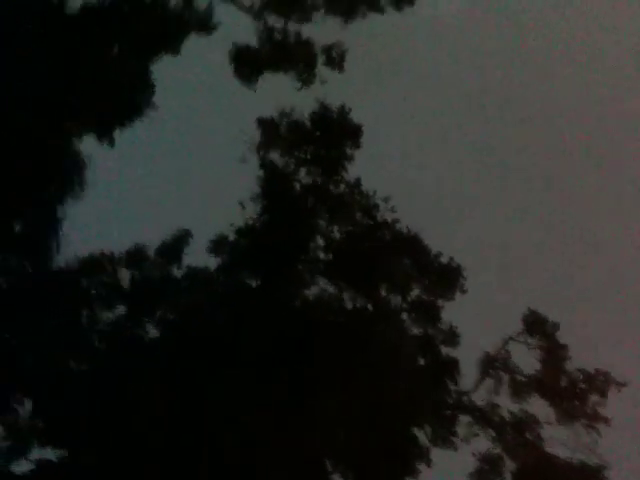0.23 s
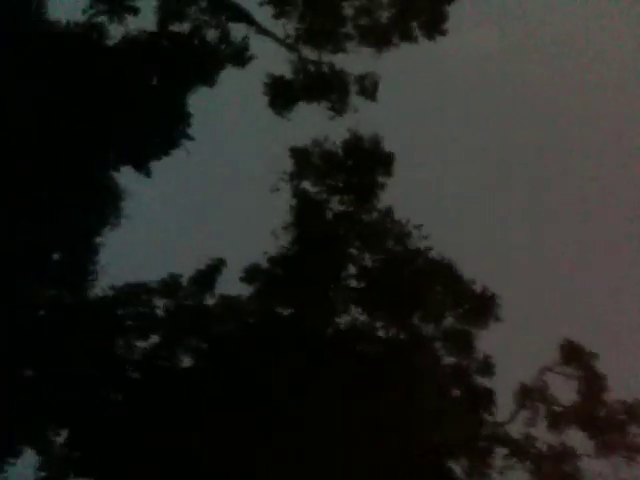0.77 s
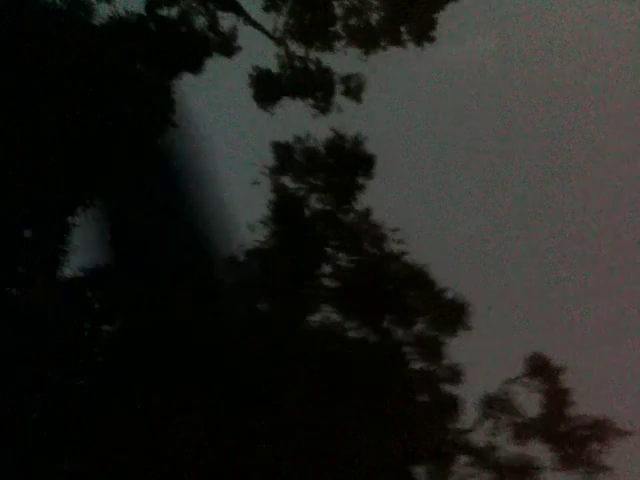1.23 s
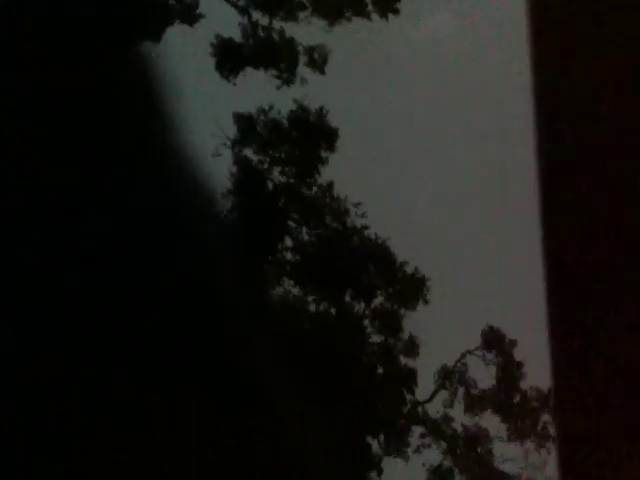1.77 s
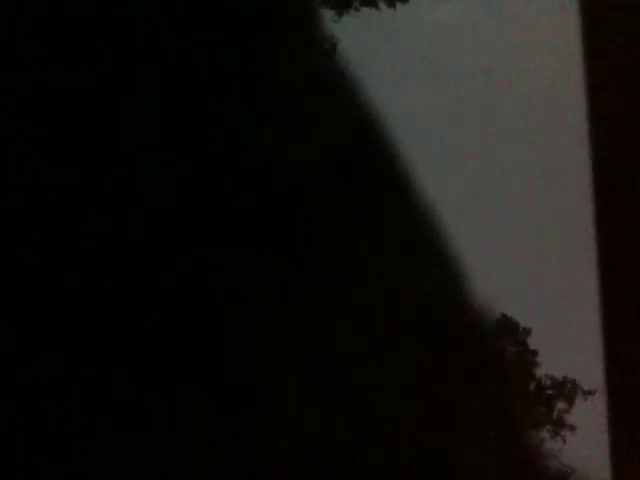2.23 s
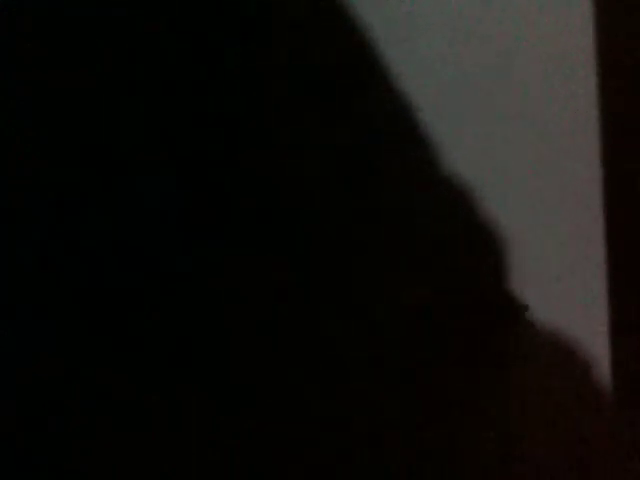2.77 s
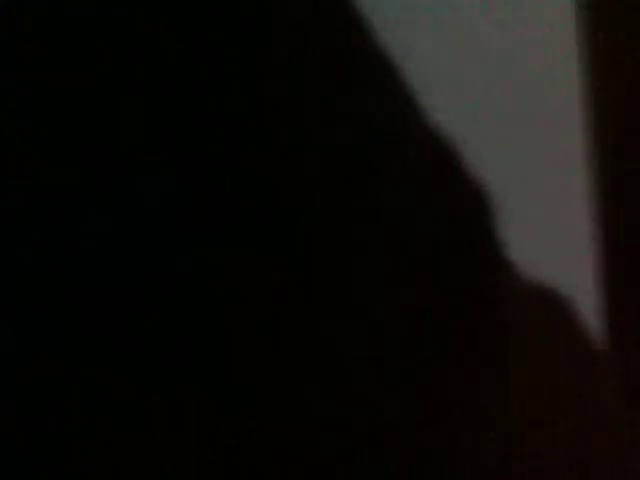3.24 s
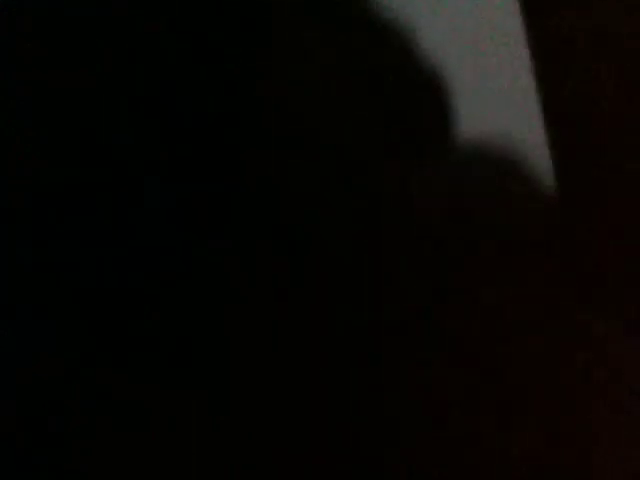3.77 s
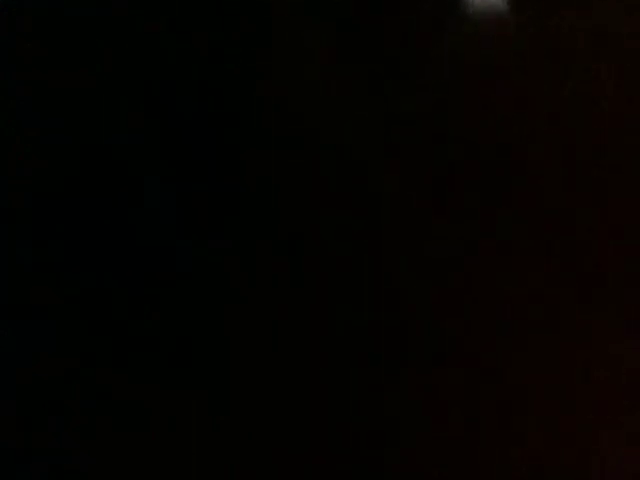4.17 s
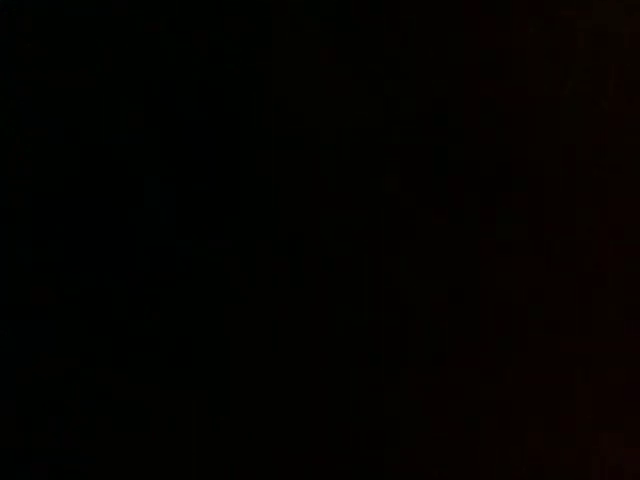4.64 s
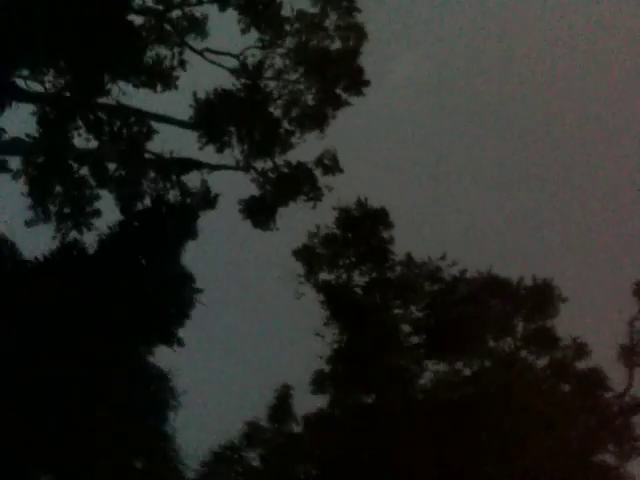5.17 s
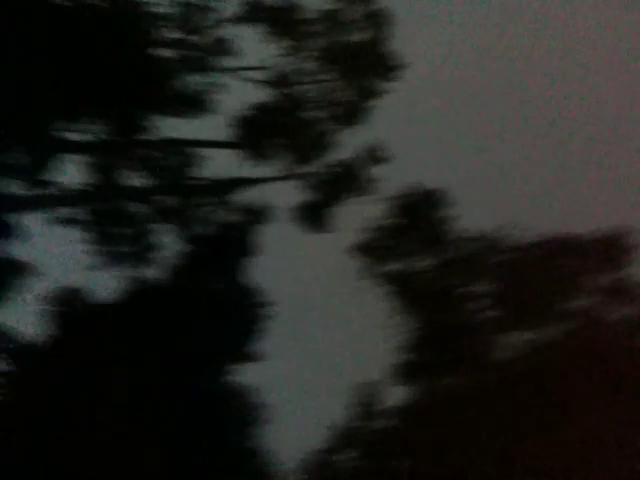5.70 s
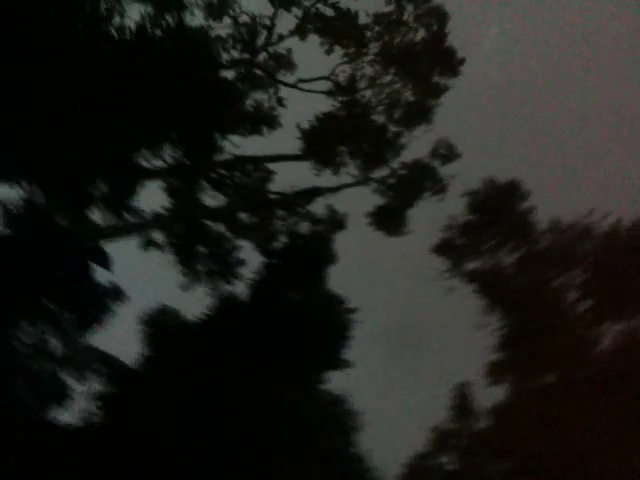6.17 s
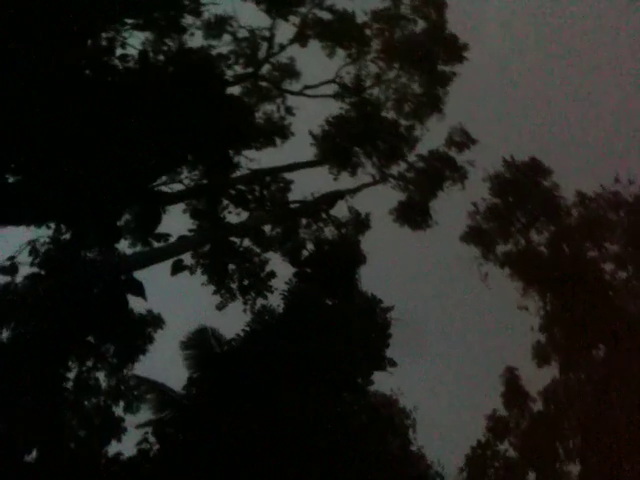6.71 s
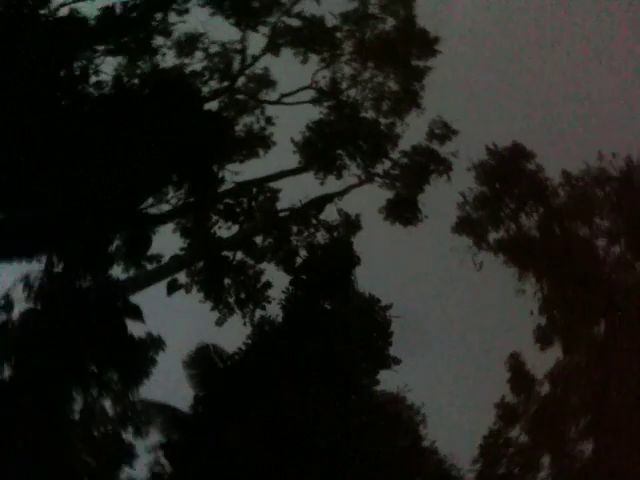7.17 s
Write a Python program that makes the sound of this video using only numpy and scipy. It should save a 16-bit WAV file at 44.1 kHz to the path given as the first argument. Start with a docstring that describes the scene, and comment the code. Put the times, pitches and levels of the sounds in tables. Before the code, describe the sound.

Many small frogs call nonstop, a low "co" and an upswept "qui", echoing among trees; a hand clicks and brushes the camera.

```python
"""Coqui frogs at dusk: near and far sine-like calls, a level low "co" and a rising "qui".
Far "qui" come in waves about four a second; far "co" join the near ones; noise echoes stand for trees.
Other frogs whistle, climb, peep and chip; crickets chirp unevenly as pulsed tones over bands of noise.
Soft air noise lies below; midway the hand-held camera clicks and brushes cloth (shaped noise, decaying sines)."""
import sys
import numpy as np
from scipy import signal
from scipy.fft import rfft, irfft, next_fast_len
from scipy.io import wavfile
from scipy.ndimage import uniform_filter1d

SR = 44100
rng = np.random.default_rng(int(sys.argv[2]) if len(sys.argv) > 2 else 0)


def store_pcm(level_fs):
    """Save levels as 16-bit WAV."""
    pcm = np.round(np.clip(level_fs, -1, 1) * 32767).astype(np.int16)
    wavfile.write(sys.argv[1], SR, np.atleast_2d(pcm).T)


N = 327663
TIME = np.arange(N) / SR
# All table levels are relative: gains, echoes and filters follow.


def undb(db):
    """Decibels to gain."""
    return 10 ** (np.asarray(db) / 20)


def unit(x):
    """Scale to rms 1."""
    return x / np.sqrt(np.mean(x ** 2))


def add(out, start_s, sound):
    """Mix a sound in at a time, trimmed to the scene."""
    i = int(start_s * SR)
    lo, hi = max(i, 0), min(i + len(sound), N)
    if hi > lo:
        out[lo:hi] += sound[lo - i:hi - i]


def colour(x, points):
    """Filter by a (freq_hz, level_db) outline, straight over log frequency; rms 1."""
    freq_hz, level_db = np.transpose(points)
    size = next_fast_len(N)
    bins_hz = np.maximum(np.fft.rfftfreq(size, 1 / SR), 1)
    gain = undb(np.interp(np.log(bins_hz), np.log(freq_hz), level_db))
    return unit(irfft(rfft(x, size) * gain, size)[:N])


def band(hz, width_hz):
    """Noise in one resonance; rms 1."""
    size = next_fast_len(N)
    bins_hz = np.fft.rfftfreq(size, 1 / SR)
    resonance = 1 / (1 + ((bins_hz - hz) / width_hz) ** 2)
    return unit(irfft(rfft(rng.standard_normal(size)) * resonance)[:N])


def walk(rate_hz):
    """Random drift around 0 in straight ramps, rms about 0.55."""
    k = int(SR / rate_hz)
    steps = np.repeat(rng.standard_normal(N // k + 1), k)
    return 0.68 * uniform_filter1d(steps, k)[:N]


def trees(x, t60_s):
    """Echoes from trunks and leaves, drawn anew for each call; they carry as much energy as the call."""
    t = TIME[:SR // 2]
    spikes = rng.standard_normal(len(t)) ** 3
    echoes = spikes * undb(-60 * t / t60_s) * (1 - np.exp(-t / 0.0044))
    heard = signal.fftconvolve(x, echoes)
    return heard * np.linalg.norm(x) / np.linalg.norm(heard)


def flutter(x, depth, fade_db=0):
    """Paths through foliage make a voice grainy, and let it swell and fade within a note."""
    return x * (1 + depth * walk(260)) * undb(fade_db * walk(55))


def note(length_s, start_hz, end_hz, second_db=-52, third_db=-52, attack_s=0.0016, arch=0.0022,
         swell=0.28, release_s=0.0037, late_swell=1.17, glide_power=1.9):
    """A vocal sac sings a near sine: it swells past the middle; its glide flattens and arches over."""
    u = np.linspace(0, 1, int(length_s * SR))
    glide_hz = end_hz + (start_hz - end_hz) * (1 - u) ** glide_power
    hz = glide_hz * (1 + arch * (np.sin(np.pi * u) - 1))
    phase = 2 * np.pi * np.cumsum(hz) / SR
    edges = np.tanh(u * length_s / attack_s) * np.tanh((1 - u) * length_s / release_s)
    effort = edges * 0.84 * (1 - swell + swell * np.sin(np.pi * u ** late_swell))
    voice = np.sin(phase) + undb(second_db) * np.sin(2 * phase) + undb(third_db) * np.sin(3 * phase)
    return np.sqrt(2) * effort * voice


# spectrum of distant air and leaves: freq_hz, level_db
AIR_SPECTRUM = [(25, -18), (45, -33), (75, -16), (125, -2), (180, 2), (400, 0.5), (800, -1), (1200, -4),
                (3800, -11.5), (5200, -11), (7400, -19), (8800, -17.5), (12000, -18), (15500, -19.5)]


def air():
    """Distant air and leaves: coloured noise with a slight drift in level."""
    return colour(rng.standard_normal(N), AIR_SPECTRUM) * undb(-68.5 + .2 * walk(7.1))


def high_tone(hz=15000, beat_hz=30, db=-94):
    """A faint, wavering tone near the top of hearing: two close sines that beat."""
    beating = np.sin(2 * np.pi * hz * TIME) * np.cos(np.pi * beat_hz * TIME)
    return 2 * undb(db + 2.7 * walk(11.0)) * beating


def insect(hz, width_hz, db, waver_db):
    """Many far wings stridulate near one pitch and blur into a wavering band of noise."""
    return band(hz, width_hz) * undb(db + waver_db * walk(9.8))


def zip_call(start_s=5.97, hz=7000, width_hz=550, db=-67, attack_s=0.0021, decay_s=0.035):
    """One insect gives a single short, high rasp."""
    t = np.maximum(TIME - start_s, 0)
    return band(hz, width_hz) * undb(db) * (1 - np.exp(-t / attack_s)) * np.exp(-t / decay_s)


# cricket chirps: start_s, pitch_hz, level_db
CRICKET_CHIRPS = [(0.021, 5940, -73), (0.441, 5930, -72.5), (.87, 5905, -76), (1.25, 5910, -74.5),
                  (1.619, 5910, -75.5), (2.091, 5960, -75.5), (2.46, 5930, -75), (2.831, 5870, -77.5),
                  (3.22, 5940, -77), (3.6, 5870, -76), (3.79, 5830, -75.5), (4.049, 5860, -79),
                  (4.21, 5770, -78), (4.47, 6000, -80), (4.84, 6000, -81), (5.359, 5820, -80),
                  (5.691, 5860, -75.5), (5.869, 5820, -75), (6.22, 5950, -75.5), (6.47, 5840, -88),
                  (6.769, 5800, -74), (7.18, 5850, -80), (7.3, 5910, -78.5)]


def crickets(length_s=0.12, stroke_hz=30, sag_hz=90, gain_db=1.5, t60_s=.14):
    """A chirp is a short run of wing strokes, each sagging in pitch as the wing slows, blurred by trees."""
    out, t = np.zeros(N), TIME[:int(length_s * SR)]
    stroke = t * stroke_hz % 1
    effort = np.sin(np.pi * stroke) ** 2 * np.sqrt(np.sin(np.pi * t / length_s))
    for start_s, pitch_hz, level_db in CRICKET_CHIRPS:
        phase = 2 * np.pi * np.cumsum(pitch_hz + sag_hz * (.5 - stroke)) / SR
        chirp = unit(np.sin(phase) * effort) * undb(level_db + gain_db)
        add(out, start_s, chirp * undb(-5.5))
        add(out, start_s, trees(chirp, t60_s) * undb(-2))
    return out


# faint hollow taps: start_s, level_db
HOLLOW_TAPS = [(0.383, -64), (1.143, -60), (3.01, -67)]


def taps(hz=560, width_hz=160, decay_s=0.0066):
    """Small dull taps nearby: short bursts of one noise resonance."""
    out, t = np.zeros(N), TIME[:SR // 16]
    dull = band(hz, width_hz)
    envelope = np.exp(-t / decay_s) * (1 - np.exp(-t / 0.0018))
    for start_s, level_db in HOLLOW_TAPS:
        add(out, start_s, 2 * undb(level_db) * dull[int(start_s * SR):][:len(t)] * envelope)
    return out


# cloth brushing the case: peak_s, rise_s, fall_s, level_db, body_db (case resonance against hiss)
CLOTH_BRUSHES = [(2.454, 0.0087, 0.016, -67.5, -14), (2.5, 0.037, 0.027, -71.5, 6),
                 (2.791, 0.0056, 0.015, -68, 1), (3.757, 0.009, 0.019, -65.5, -18),
                 (4.48, 0.059, 0.15, -64.5, -9), (4.536, .004, 0.0047, -80, 16),
                 (4.578, 0.016, 0.021, -68.5, 8), (4.625, 0.034, 0.03, -69, -14),
                 (4.66, 0.023, 0.015, -62, -4), (4.71, .03, 0.034, -79, -9),
                 (4.785, 0.031, 0.028, -58.5, -14), (4.806, 0.017, 0.015, -58.5, 11.5),
                 (4.928, 0.0014, 0.0059, -76, 27.5)]
# spectrum of the cloth hiss: freq_hz, level_db
CLOTH_SPECTRUM = [(60, -44), (300, -13), (700, 4), (1200, -11), (3500, -6.5), (6500, 6.5), (9000, -3),
                  (15000, -5)]
# spectrum of the brushed case: freq_hz, level_db
CASE_SPECTRUM = [(60, -35), (560, -37), (700, -2.5), (850, -7), (1050, -16), (2200, 4.5), (3600, -1),
                 (5000, -16.5), (12000, -66)]


def brushes(grain_db=2.5, catch_db=3, rattle_db=4.5):
    """Cloth catches and slips on the case in tiny grains: hiss plus the rattling case."""
    grains = rng.standard_normal(N) * undb(grain_db * walk(1100) + catch_db * walk(170))
    hiss = colour(grains, CLOTH_SPECTRUM)
    body = colour(grains * undb(rattle_db * walk(400)), CASE_SPECTRUM)
    out = np.zeros(N)
    for peak_s, rise_s, fall_s, level_db, body_db in CLOTH_BRUSHES:
        pressure = np.exp(-((TIME - peak_s) / np.where(TIME < peak_s, rise_s, fall_s)) ** 2)
        out += pressure * undb(level_db) * (hiss + undb(body_db) * body)
    return out


# fingers on the case: start_s, thud_hz, thud_db, ring_db, click_db
FINGER_KNOCKS = [(2.79, 104, -65, -82, -75), (3.158, 181, -60, -52.5, -26), (3.826, 203, -57, -63, -48),
                 (4.493, 193, -58.5, -53, -68), (4.566, 153, -52, -68, -66), (4.577, 170, -59, -55, -40),
                 (4.619, 181, -60, -66, -55), (4.654, 199, -66, -56, -58), (4.795, 197, -85, -58, -37),
                 (4.8, 201, -86, -62, -44), (4.812, 200, -84, -56, -45), (4.926, 220, -65, -61, -63)]
# spectrum of the hard plastic click: freq_hz, level_db
CLICK_SPECTRUM = [(300, -38), (2000, -7.5), (5300, -5), (6100, 3), (7180, -11), (8000, 2), (9000, -7.5),
                  (12500, -11), (15000, -3)]
# hollow ring of the case: freq_hz, decay_s, level_db
RING_MODES = [(470, 0.0026, -7), (650, 0.0041, -2), (765, 0.0044, -2), (1050, .002, -15)]


def knocks(thud_s=0.0037, click_decay_s=0.00099):
    """Fingers knock on the case: a low thud, a plastic click and a hollow ring."""
    out, t = np.zeros(N), TIME[:SR // 8]
    plastic = colour(rng.standard_normal(N), CLICK_SPECTRUM)
    hollow = sum(undb(level_db) * np.sin(2 * np.pi * freq_hz * t) * np.exp(-t / decay_s)
                 for freq_hz, decay_s, level_db in RING_MODES)
    thud_envelope = (t / thud_s * np.exp(1 - t / thud_s)) ** 2
    onset = 1 - np.exp(-t / 0.0009)
    for start_s, thud_hz, thud_db, ring_db, click_db in FINGER_KNOCKS:
        i = int(start_s * SR)
        thud = undb(thud_db) * np.sin(2 * np.pi * thud_hz * t) * thud_envelope
        click = undb(click_db) * plastic[i:i + len(t)] * np.exp(-t / click_decay_s)
        ring = undb(ring_db) * hollow
        add(out, start_s, thud + (ring + click) * onset)
    return out


def low_cut(x, hz=85):
    """The small microphone loses the deep bass of a knock."""
    return signal.sosfilt(signal.butter(3, hz, "high", fs=SR, output="sos"), x)


def far_call(length_s, start_hz, end_hz, t60_s):
    """One distant note: the straight path keeps its glide, slightly stronger echoes come through the trees."""
    call = note(length_s, start_hz, end_hz)
    heard = trees(call, t60_s)
    add(heard, 0, call * undb(-1.5))
    return heard


def stray_frogs(length_s, start_hz, end_hz, pitch_spread, t60_s, count):
    """The farthest frogs call at jittered even steps, on scattered pitches, and merge into a wash; rms 1."""
    out = np.zeros(N)
    jitter = rng.uniform(-1, 1, (count, 2))
    for when_s, (late, pitch) in zip(np.linspace(-.3, N / SR, count), jitter):
        stretch = 1 + pitch_spread * pitch
        call = far_call(length_s, start_hz * stretch, end_hz * stretch, t60_s)
        add(out, when_s + .04 * late, call)
    return unit(out)


def spread(share, count):
    """Pitch ratios of a group of frogs: each has a place of its own within the range."""
    return 1 + share * (np.linspace(-1, 1, count) + rng.uniform(-1.005, 1, count) / count)


def wave_of_calls(pitches_hz, length_s, rise, stagger_s, t60_s):
    """Far frogs join in one by one, each on its own pitch; the energy of one note of rms 1."""
    wave, count = np.zeros(SR), len(pitches_hz)
    turns = (rng.permutation(count) + rng.random(count)) / count
    for turn, hz in zip(turns, pitches_hz):
        call = far_call(length_s, hz * (1 - rise), hz, t60_s)
        add(wave, stagger_s * turn, call)
    return wave * np.sqrt(length_s * SR / np.sum(wave ** 2))


# spectrum of the far "co": freq_hz, level_db
FAR_CO_SPECTRUM = [(1250, -35), (1350, -2.5), (1420, 0.5), (1550, -2), (1620, 1), (1750, 11.5), (1900, 11)]


def far_co(centre_hz=1505, pitch_spread=0.03013, pull=0.669, lag_s=.004, gain_db=-6.5, stray_db=-64):
    """Far frogs join each near "co", around a pitch between that frog's and the usual one."""
    out = undb(stray_db) * stray_frogs(0.051, 1466.6, 1520, pitch_spread=0.079, t60_s=1.0, count=150)
    for start_s, length_s, pitch_hz, level_db in CO_NOTES:
        pitches_hz = (centre_hz + pull * (pitch_hz - centre_hz)) * spread(pitch_spread, count=3)
        wave = wave_of_calls(pitches_hz, length_s, rise=0.01975, stagger_s=.035, t60_s=.4)
        add(out, start_s + lag_s, undb(level_db + gain_db) * wave)
    return colour(out, FAR_CO_SPECTRUM) * np.std(out)


# waves of the far crowd: start_s, level_db
QUI_WAVES = [(.08, -45), (.24, -52.5), (0.518, -44.5), (.89, -51), (.98, -51.5), (1.27, -48.5), (1.5, -54),
             (1.68, -50.5), (1.95, -44), (2.169, -53), (2.33, -43.5), (2.469, -54), (2.719, -49.5),
             (2.871, -50.5), (3.149, -48.5), (3.42, -52), (3.599, -49), (3.859, -52), (4.031, -46),
             (4.29, -47), (4.56, -58.5), (4.691, -43.5), (5.03, -46), (5.299, -51), (5.441, -53),
             (5.74, -44), (5.831, -50), (6.14, -42), (6.301, -51.5), (6.49, -50), (6.6, -49.5),
             (6.91, -47.5), (7.272, -45)]
# spectrum of the far "qui": freq_hz, level_db
FAR_QUI_SPECTRUM = [(1700, 5), (2000, 0.5), (2200, -9.5), (2450, -2.5), (2750, 3), (3020, -3.5), (3120, 4),
                    (3240, 3), (3500, -19)]


def far_qui(top_hz=2840, pitch_spread=.075, lag_s=0.001991, gain_db=-2.5, stray_db=-59):
    """The crowd's rising notes come in waves, over a thin wash of stray callers."""
    out = undb(stray_db) * stray_frogs(.1, 2400, 2880, pitch_spread=.085, t60_s=0.91, count=130)
    for start_s, level_db in QUI_WAVES:
        pitches_hz = top_hz * spread(pitch_spread, count=6)
        wave = wave_of_calls(pitches_hz, length_s=.125, rise=.19, stagger_s=.045, t60_s=.6)
        add(out, start_s + lag_s, undb(level_db + gain_db) * wave)
    return colour(flutter(out, FROG_GRAIN), FAR_QUI_SPECTRUM) * np.std(out)


# sharp falling chips: start_s, start_hz, end_hz, level_db
FALLING_CHIPS = [(2.295, 2530, 1974, -53), (6.623, 2510, 1930, -52)]


def chips(drop_s=0.0073, decay_s=0.017, second_db=-3, echo_db=-8, snap_db=-4, snap_s=0.012):
    """A chip starts with a noisy snap, drops fast in pitch and fades on its low note."""
    out, t = np.zeros(N), TIME[:SR // 12]
    rasp = band(2800, 935)
    for start_s, start_hz, end_hz, level_db in FALLING_CHIPS:
        hz = end_hz + (start_hz - end_hz) * np.exp(-t / drop_s)
        phase = 2 * np.pi * np.cumsum(hz) / SR
        tone = (np.sin(phase) + undb(second_db) * np.sin(2 * phase)) * np.exp(-t / decay_s)
        snap = undb(snap_db) * rasp[int(start_s * SR):][:len(t)] * np.exp(-t / snap_s)
        call = (tone + snap) * (1 - np.exp(-t / 0.0093)) * 2 * undb(level_db)
        add(out, start_s, call)
        add(out, start_s, trees(call, 0.13) * undb(echo_db))
    return out


FROG_GRAIN = .12  # flutter depth
QUI_FADE_DB, LOW_FADE_DB = 2.8, .8  # scale of the fading within a note


def near_frogs(rows, gain_db, echo_db, t60_s, grain, attack_s, arch, swell, fade_db, glide_power=1.9):
    """Single callers; the louder a frog, the closer it is and the smaller its share of echo."""
    direct, echo = np.zeros(N), np.zeros(N)
    for start_s, length_s, start_hz, end_hz, level_db, *harmonics_db in rows:
        call = note(length_s, start_hz, end_hz, *harmonics_db, attack_s=attack_s, arch=arch,
                    swell=swell, glide_power=glide_power)
        call *= undb(level_db + gain_db)
        nearness_db = max(level_db + 47.0, 0)
        add(direct, start_s, call)
        add(echo, start_s, trees(call, t60_s) * undb(echo_db - 0.67 * nearness_db))
    return flutter(direct, grain, fade_db) + echo


# arched peeps: start_s, length_s, start_hz, end_hz, level_db, second_db, third_db
ARCHED_PEEPS = [(2.0, .085, 1630, 1656, -60.5, 1, -13), (2.06, 0.099, 1690, 1650, -65, -3, -12),
                (6.348, 0.1, 1665, 1635, -63.5, 8.5, -12)]


def peeps():
    """Arched, swelling peeps with a strong 2nd harmonic."""
    return near_frogs(ARCHED_PEEPS, gain_db=1.5, echo_db=-9, t60_s=0.23, grain=FROG_GRAIN,
                      attack_s=0.006, arch=0.014, swell=0.8, fade_db=LOW_FADE_DB)


# hoarse climbing calls: start_s, length_s, start_hz, end_hz, level_db, second_db
CLIMBING_CALLS = [(.425, 0.079, 1670, 2035, -57, -14), (.68, .09, 1710, 2063, -58.5, -15)]


def climbs():
    """Climbing calls, made hoarse by deep grain."""
    return near_frogs(CLIMBING_CALLS, gain_db=-2.5, echo_db=-1.5, t60_s=0.2, grain=.7, attack_s=0.0029,
                      arch=0.002, swell=0.14, fade_db=QUI_FADE_DB, glide_power=1.35)


# reedier whistles: start_s, length_s, start_hz, end_hz, level_db, second_db, third_db
REEDY_WHISTLES = [(.265, 0.11, 1406, 1398, -55.5, -28, -19), (1.04, 0.082, 1485, 1470, -52.5, -31, -24),
                  (2.7, 0.089, 1250, 1315, -73, -17, -22), (3.73, 0.12, 1370, 1394, -56.5, -37, -20),
                  (4.22, 0.16, 1570, 1740, -57, -19, -41), (5.88, 0.187, 1364, 1405, -58, -14, -24),
                  (6.864, 0.017, 4250, 4150, -64, -42, -42), (7.125, 0.025, 1640, 1510, -66, -38, -38)]


def whistles():
    """Whistles made reedier by harmonics and grain."""
    return near_frogs(REEDY_WHISTLES, gain_db=0.0, echo_db=-3.5, t60_s=0.14, grain=0.34,
                      attack_s=0.0051, arch=0.014, swell=0.24, fade_db=LOW_FADE_DB)


# "co" notes, also joined by far_co: start_s, length_s, pitch_hz, level_db
CO_NOTES = [(.01, 0.11, 1555, -58), (0.258, 0.11, 1563, -51), (0.264, 0.094, 1409, -49.5),
            (0.428, 0.088, 1470, -57.5), (.63, 0.054, 1470, -52.5), (0.699, 0.08, 1410, -53.5),
            (.761, 0.13, 1500, -64.5), (1.015, 0.096, 1540, -50), (1.222, .06, 1760, -69),
            (1.278, 0.11, 1560, -47.5), (1.38, 0.078, 1630, -55.5), (1.448, 0.078, 1440, -56),
            (1.52, 0.074, 1550, -56.5), (1.685, 0.07, 1420, -57.5), (1.727, 0.089, 1590, -53.5),
            (1.802, 0.061, 1450, -55), (2.062, 0.12, 1550, -48.5), (2.186, .11, 1456, -55.5),
            (2.382, 0.087, 1660, -57), (2.478, 0.128, 1471, -50.5), (2.599, .1, 1500, -55.5),
            (2.866, 0.082, 1400, -58), (2.885, 0.083, 1534, -49), (2.95, .12, 1525, -49.5),
            (3.06, 0.085, 1510, -64), (3.221, 0.11, 1380, -62), (3.315, 0.073, 1565, -47.5),
            (3.42, 0.16, 1480, -54.5), (3.63, .12, 1460, -52), (3.718, 0.037, 1770, -67),
            (3.813, 0.081, 1620, -51), (3.86, .06, 1510, -56.5), (4.048, 0.098, 1547, -47),
            (4.202, 0.091, 1504, -60), (4.4, 0.098, 1468, -52.5), (4.518, 0.11, 1440, -57),
            (4.785, 0.093, 1573, -51.5), (4.871, 0.089, 1490, -56), (5.09, 0.15, 1516, -58),
            (5.251, 0.086, 1405, -52.5), (5.463, 0.14, 1555, -46.5), (5.65, 0.094, 1520, -56.5),
            (5.84, 0.12, 1450, -50), (5.961, 0.095, 1483, -51), (6.28, 0.098, 1610, -54),
            (6.34, 0.079, 1665, -59), (6.302, 0.097, 1506, -54.5), (6.48, .09, 1520, -57.5),
            (6.652, .11, 1557, -48), (7.02, 0.066, 1530, -51.5), (7.085, 0.062, 1430, -55),
            (7.207, 0.065, 1540, -50.5)]


def near_co(rise=0.0087, second_db=-35, third_db=-32.5):
    """Every "co" is nearly level, with faint 2nd and 3rd harmonics."""
    rows = [(start_s, length_s, pitch_hz * (1 - rise), pitch_hz, level_db, second_db, third_db)
            for start_s, length_s, pitch_hz, level_db in CO_NOTES]
    return near_frogs(rows, gain_db=-0.5, echo_db=-8.5, t60_s=.5, grain=FROG_GRAIN, attack_s=0.0017,
                      arch=.018, swell=0.31, fade_db=LOW_FADE_DB)


# rising "qui" notes: start_s, length_s, top_hz, level_db
QUI_NOTES = [(0.038, 0.085, 2780, -66), (0.073, 0.14, 2677, -52.5), (0.311, 0.11, 2890, -51),
             (0.446, 0.054, 2690, -51), (0.511, 0.13, 2957, -47), (0.516, 0.14, 2843, -42.5),
             (0.628, .1, 2828, -49.5), (0.842, 0.11, 2560, -55.5), (0.904, 0.1, 2716, -47.5),
             (0.943, 0.058, 2410, -50), (.95, 0.11, 2850, -53), (1.267, 0.15, 2956, -47),
             (1.281, 0.097, 2666, -45), (1.348, 0.095, 2772, -46), (1.523, 0.055, 2595, -51.5),
             (1.566, 0.055, 2720, -43.5), (1.601, 0.083, 2817, -51.5), (1.682, 0.08, 2585, -50.5),
             (1.7, 0.063, 2923, -46.5), (1.941, 0.09, 2696, -48), (1.989, 0.11, 2970, -53),
             (2.377, 0.12, 3064, -42), (2.483, 0.072, 3064, -34.5), (2.731, 0.058, 2525, -54),
             (2.764, 0.076, 2930, -58), (2.83, 0.12, 2864, -51), (2.876, 0.096, 2704, -52),
             (3.106, 0.12, 2803, -47.5), (3.135, 0.072, 2437, -50), (3.168, .16, 2860, -47),
             (3.416, 0.099, 2730, -55), (3.48, .11, 2915, -57.5), (3.541, 0.11, 2720, -52),
             (3.602, 0.1, 2890, -52.5), (3.592, 0.086, 3120, -59), (3.704, 0.084, 2904, -49.5),
             (3.708, 0.084, 2670, -55), (3.863, .15, 2708, -52), (3.882, 0.12, 3026, -53.5),
             (3.995, 0.11, 2640, -46.5), (4.049, 0.11, 2768, -43), (4.09, 0.082, 2832, -48.5),
             (4.291, 0.087, 2660, -43.5), (4.307, 0.17, 2890, -50.5), (4.579, 0.17, 2752, -51),
             (4.991, .09, 2862, -51.5), (5.076, 0.12, 2944, -47.5), (5.159, 0.086, 3070, -55),
             (5.279, 0.11, 2713, -53), (5.447, 0.078, 2850, -45.5), (5.515, 0.071, 3090, -44),
             (5.517, 0.062, 2390, -53), (5.683, .14, 2780, -47.5), (5.766, .1, 2890, -42),
             (5.77, 0.1, 2856, -45.5), (6.113, .14, 2810, -52), (6.148, 0.14, 2740, -46.5),
             (6.185, .11, 2955, -54), (6.318, 0.073, 2676, -52.5), (6.511, 0.078, 2906, -52.5),
             (6.541, 0.09, 2630, -61), (6.626, 0.093, 2896, -51.5), (6.797, 0.039, 2928, -35),
             (6.89, 0.14, 2805, -45), (7.049, 0.086, 2882, -50.5), (7.26, 0.0458, 2470, -48),
             (7.298, 0.09, 2958, -47.5), (7.313, 0.096, 2720, -56)]


def near_qui(rise=.15, rise_length_s=.13, rise_power=0.52):
    """Every "qui" scoops up to its frog's top pitch; longer notes climb further."""
    rows = []
    for start_s, length_s, top_hz, level_db in QUI_NOTES:
        start_hz = top_hz * (1 - rise * (length_s / rise_length_s) ** rise_power)
        rows.append((start_s, length_s, start_hz, top_hz, level_db))
    return near_frogs(rows, gain_db=-1.0, echo_db=-.8, t60_s=0.42, grain=FROG_GRAIN, attack_s=.004,
                      arch=0.0047, swell=0.4, fade_db=QUI_FADE_DB)


def scene():
    """Evening air, insects, the hand on the camera, and frogs far and near."""
    insects = crickets() + insect(5804, 150, -77.0, 1.6) + insect(7180, 590, -79.0, 1.0) + zip_call()
    background = air() + high_tone() + insects
    touches = low_cut(taps() + brushes() + knocks())
    others = chips() + peeps() + climbs() + whistles()
    coquis = far_co() + far_qui() + near_co() + near_qui()
    return (background + touches + others + coquis)[None]


def record(dry, top_hz=15700):
    """The camera cuts the top of the treble."""
    return signal.sosfilt(signal.ellip(10, .2, 70, top_hz, fs=SR, output="sos"), dry)


dry = scene()
out = record(dry)
store_pcm(out)
```